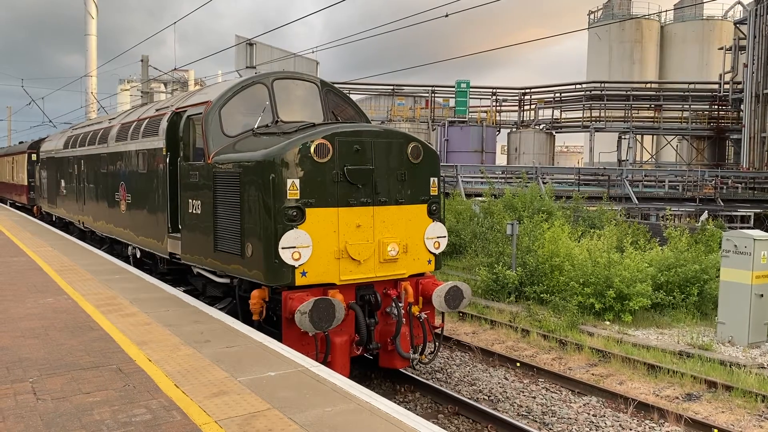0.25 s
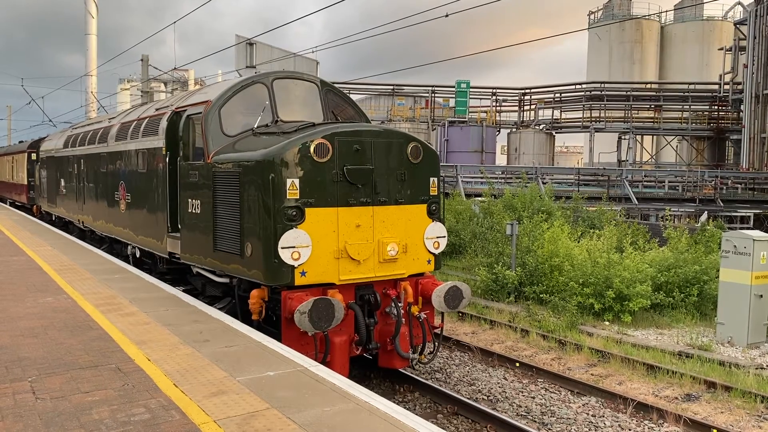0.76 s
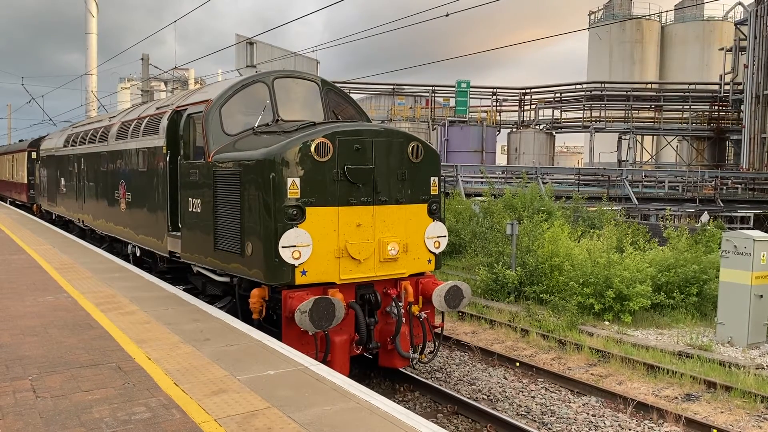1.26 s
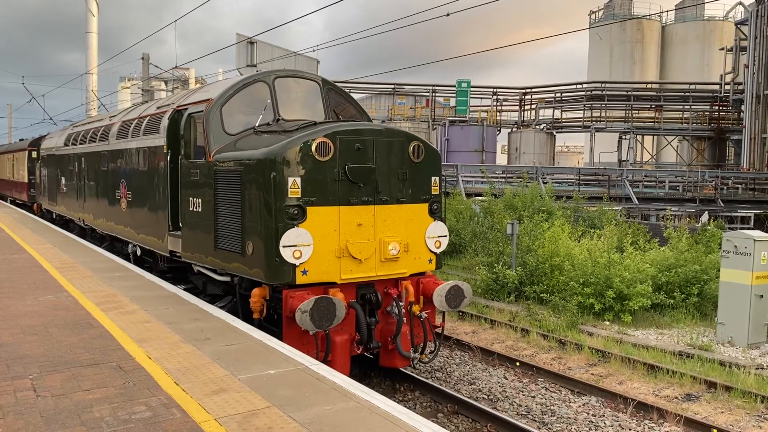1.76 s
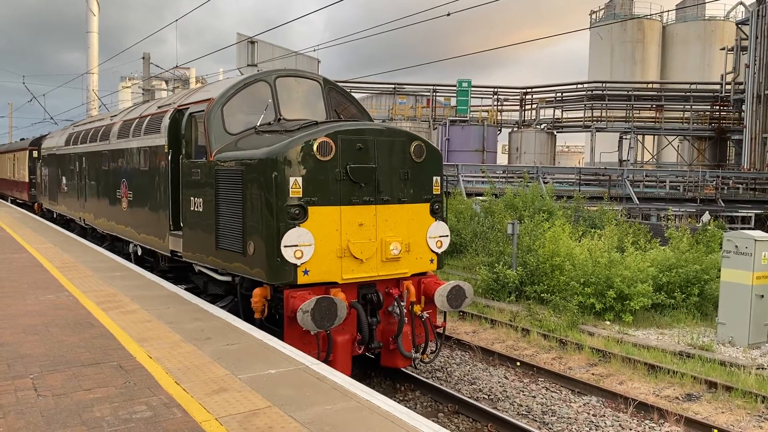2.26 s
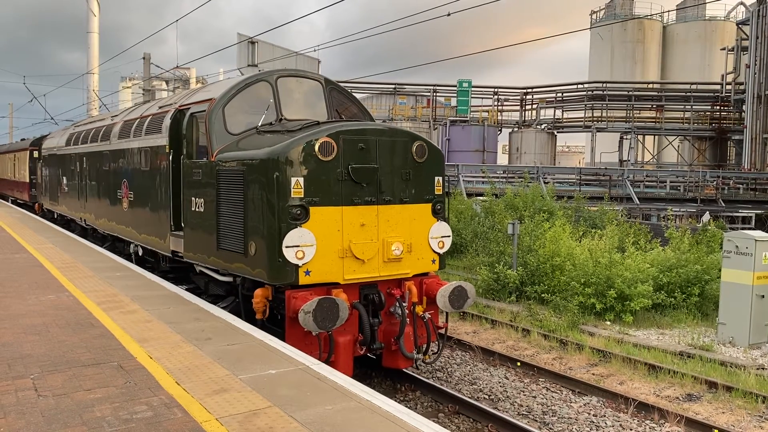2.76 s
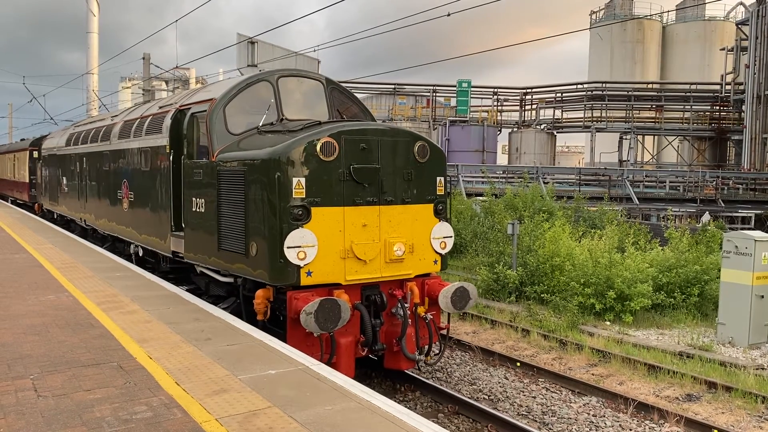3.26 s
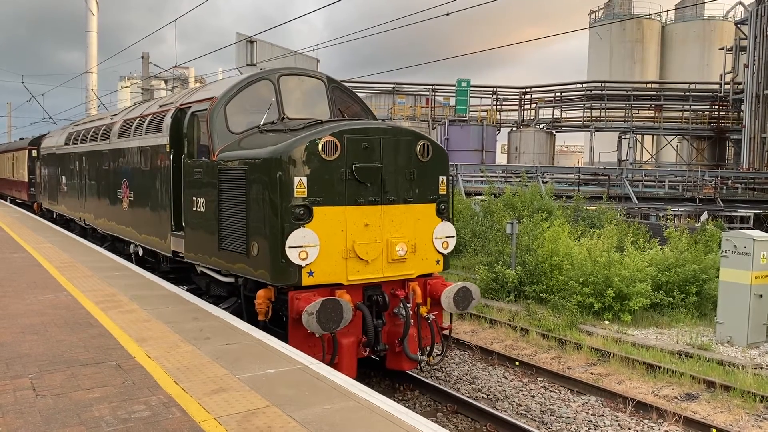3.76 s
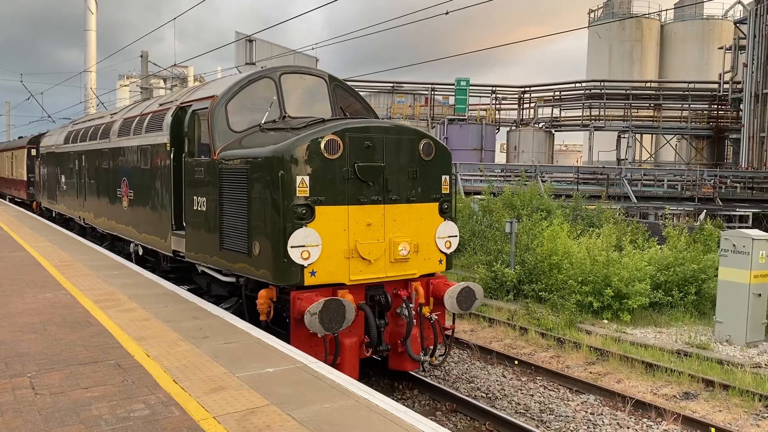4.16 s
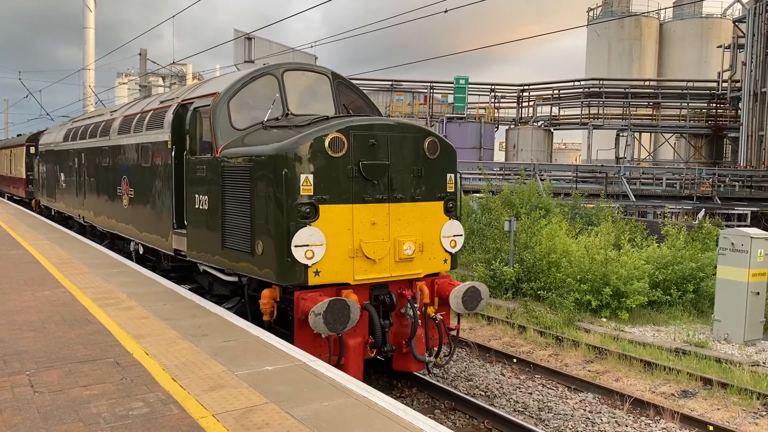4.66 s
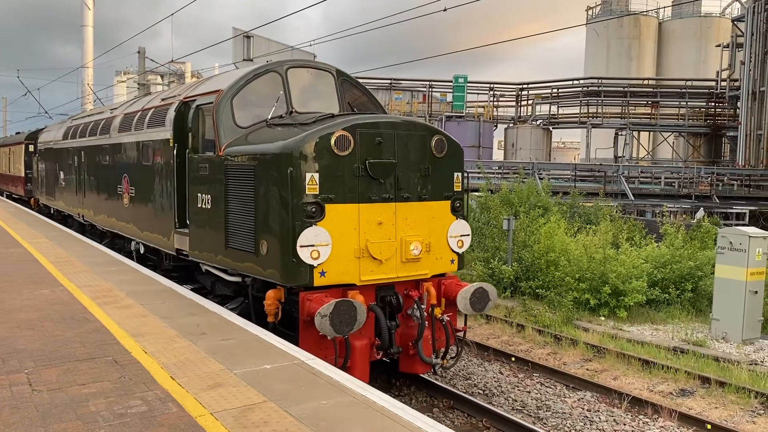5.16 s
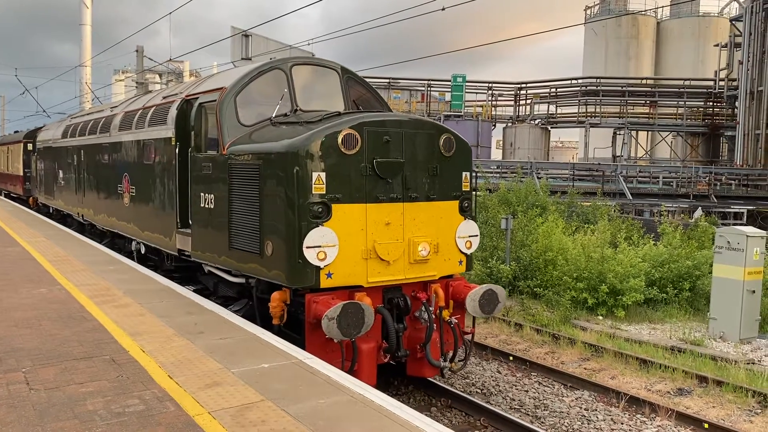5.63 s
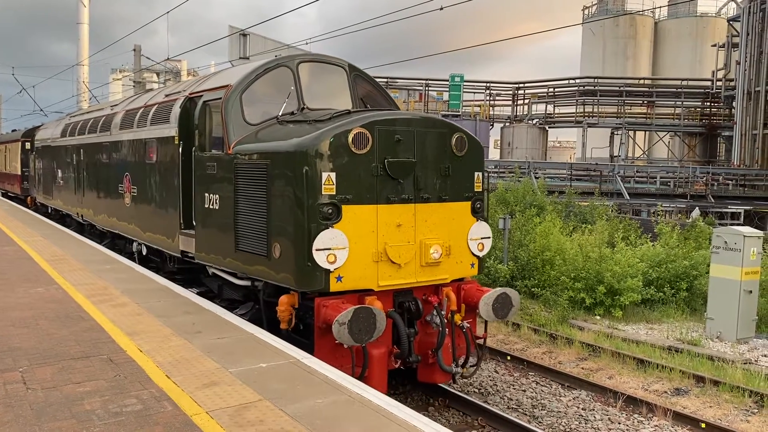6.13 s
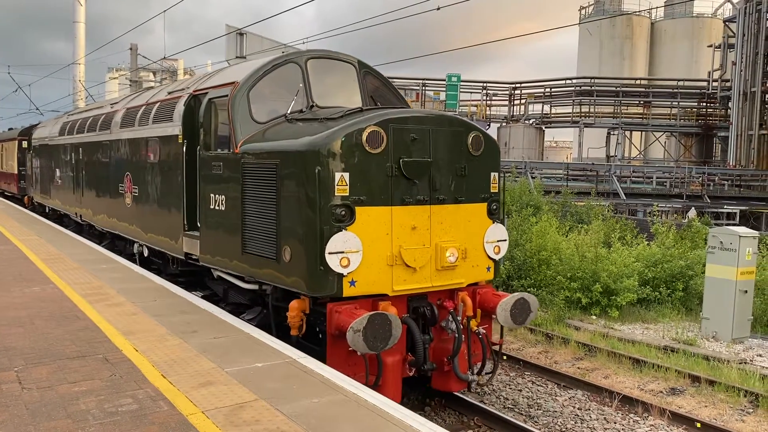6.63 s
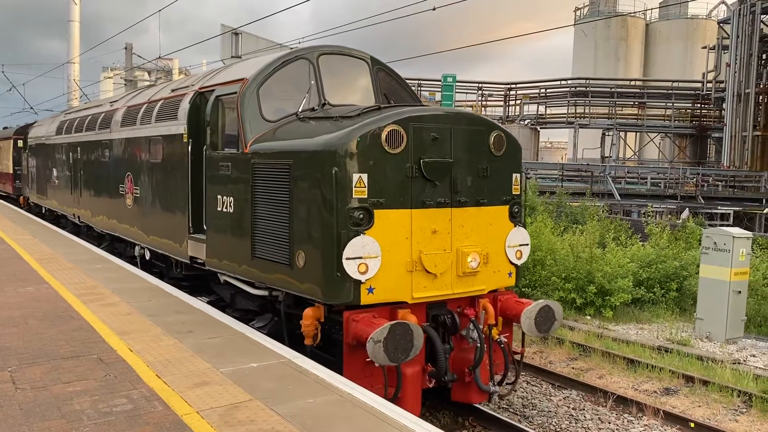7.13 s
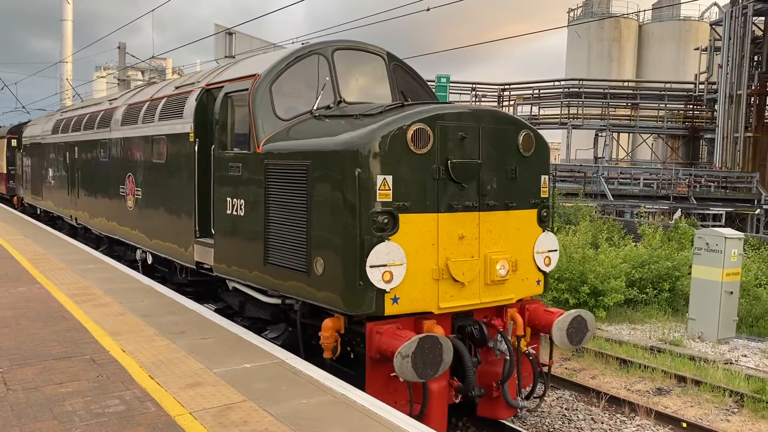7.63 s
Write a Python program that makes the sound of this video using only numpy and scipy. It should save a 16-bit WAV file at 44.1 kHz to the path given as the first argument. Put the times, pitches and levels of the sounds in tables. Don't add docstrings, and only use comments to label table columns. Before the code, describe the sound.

A diesel locomotive idles unevenly beside a platform, its turbo whistle wavering, then opens up into roaring exhaust blasts and a climbing whistle.

```python
import sys
import numpy as np
from scipy import signal
from scipy.fft import rfft, irfft, next_fast_len
from scipy.io import wavfile
from scipy.ndimage import uniform_filter1d

SR = 44100
rng = np.random.default_rng(int(sys.argv[2]) if len(sys.argv) > 2 else 0)


def voltage_ratio(level):
    return 10 ** (np.asarray(level, float) / 20)


def bounce(signal):
    frames = np.transpose(np.atleast_2d(signal))
    limited = np.clip(frames, -1, 1)
    pcm = np.round(limited * 32767).astype(np.int16)
    wavfile.write(sys.argv[1], SR, pcm)


N = 347949
TIME = np.arange(N) / SR

# place in sixteenths of a cycle, hiss level/dB, knock level/dB
FIRINGS = [(.6, -12, -9), (1.85, -1, -5), (4.4, -9, -9), (5.75, 0, -1), (7.75, -1, -6), (10.6, -13, -7),
           (11.75, -1, -1), (14.4, -6.5, -7)]


def evened(x):
    return x / np.sqrt(np.mean(x ** 2) + 1e-20)


def curves(rows):
    s, *columns = np.transpose(rows)
    return [np.interp(TIME, s, c) for c in columns]


def bump(s, width_s):
    return np.exp(-((TIME - s) / width_s) ** 2)


def noise(points):
    f, db = np.transpose(points)
    size = next_fast_len(N, True)
    hz = np.fft.rfftfreq(size, 1 / SR)
    gain = voltage_ratio(np.interp(np.log(hz + 1), np.log(f), db, left=-90, right=-90))
    return evened(irfft(rfft(rng.standard_normal(size)) * gain, size)[:N])


def drift(top_hz):
    f, start = np.geomspace(top_hz / 8, top_hz, 8), rng.random(8)
    t = TIME[::256, None]
    wander = np.sin(2 * np.pi * (f * t + start)).sum(1)
    return np.interp(TIME, t[:, 0], evened(wander))


def resonate(x, hz, width):
    turn = np.exp(2j * np.pi * np.cumsum(hz * np.ones(N)) / SR)
    r = np.exp(-np.pi * width / SR)
    return 2 * (turn * signal.lfilter([1 - r], [1, -r], x / turn)).real


def pipe(x, hz, width):
    peak = signal.iirpeak(hz, hz / width, SR)
    return signal.lfilter(*peak, signal.lfilter(*peak, x))


def breeze():
    # f/Hz, level/dB
    flutter = [(22, -16), (45, 0), (70, -1), (130, -5), (220, -15), (400, -32)]
    return voltage_ratio(-36) * np.array([noise(flutter), noise(flutter)])


def yard(x):
    t60_s = .1
    taps = np.zeros((6, 8000))
    at = np.arange(150, 7980, 20) + rng.integers(0, 20, (6, 392))
    np.put_along_axis(taps, at, rng.choice([-1., 1.], at.shape), 1)
    taps *= voltage_ratio(-60 * np.arange(8000) / SR / t60_s)
    turns = np.sqrt(2 / 3) * np.cos(2 * np.pi * (2.3 * TIME + np.arange(3)[:, None] / 3))
    sends = np.tile(x * turns, (2, 1))
    wet = signal.oaconvolve(sends, taps / np.linalg.norm(taps[0]), axes=1)[:, :N]
    return wet.reshape(2, 3, N).sum(1)


def generator():
    # f/Hz, level/dB
    tones = [(500.5, -42)]
    hum = 0
    for hz, db in tones:
        phase = hz * TIME + 0.31 * drift(9.)
        hum = hum + voltage_ratio(db + 2.5 + 3 * drift(2.6)) * np.sqrt(2) * np.sin(2 * np.pi * phase)
    return hum


def clunks():
    # t/s, peak level/dB, ring f/Hz, t60/s
    strains = [(0.116, 4.5, 226, 0.021), (2.069, -12, 250, 0.06), (2.771, -5.5, 227, 0.059),
               (6.34, -10, 182, 0.34), (4.035, -9.0, 510, 0.14), (6.282, -7.5, 236, 0.078),
               (6.452, -17, 210, 0.074), (6.35, -13, 210, .15)]
    out, t = np.zeros(N + 9000), np.arange(9000) / SR
    for s, db, hz, t60 in strains:
        envelope = voltage_ratio(db - 60 * t / t60) * (1 - np.exp(-t / 0.0053))
        out[round(s * SR):][:9000] += envelope * np.sin(2 * np.pi * hz * t)
    return out[:N]


def levels(cycles, load):
    # t/s, level change/dB, half-width/s
    lulls = [(.06, 5, 0.025), (.31, -3, .12), (1.19, 0, .06), (2.022, 1, .15), (3.05, 3, 0.094),
             (3.14, -2, .05), (3.25, 3.5, 0.055), (3.82, -9, 0.039), (4.48, -5.5, 0.074), (4.65, 1.5, 0.13),
             (4.85, 1.5, 0.12), (5.69, -6, 0.066), (5.92, 7, .04), (6.02, 0, 0.025), (6.111, -1.5, .04),
             (6.22, -11, 0.033), (6.72, -12, 0.025), (7.29, -31, 0.039), (7.5, 1, 0.037), (7.56, -7, 0.037),
             (7.88, -2, 0.074)]
    # t/s, level change/dB
    blower_swell = [(0, 0), (.4, -3), (.7, 0), (1.3, -4), (1.7, 3), (2.3, 5), (2.8, 5), (3.0, -4), (3.5, 0),
                    (3.9, -6), (4.3, 2), (4.7, 1), (5, 2), (5.4, 4), (5.7, -5), (6.3, -3), (6.7, 5),
                    (7.1, -2)]
    touch = np.tanh(load / 0.26)
    thump_db = -24 + 0.5 * touch + 4 * load
    casing_db = -30.5 + 1.92 * touch + 6 * load
    hiss_db = -45 - 1.56 * touch + 11.5 * load
    blower_db = -26.5 + 5 * touch - 4.5 * load
    thump_db += sum(db * bump(s, w) for s, db, w in lulls)
    thump_db -= 1.5 * np.cos(2 * np.pi * (cycles - 1))
    hiss_db += 1.5 * bump(6.8, 0.19)
    blower_db += curves(blower_swell)[0]
    return thump_db, casing_db, hiss_db, blower_db


def thump(cycles, level_db, blower_db):
    # multiple of the cycle rate, level against the thump/dB
    orders_db = [(12, -19), (13, -15), (14, -15), (15, -14), (16, -3), (17, -9), (18, -11), (19, -11),
                 (20, -15), (21, -11), (23, -11), (24, -10), (25, -12), (26, -12), (28, -11), (34.4, -13),
                 (36, -18), (44, -16)]
    # f/Hz, level/dB
    rumble = [(22, -53), (40, 1.5), (60, -10), (100, 2.5), (130, 2.5), (180, -4), (260, -11.5), (400, -16)]
    # t/s, level change/dB, half-width/s
    slack = [(.55, -1.5, 0.17), (1.15, 2.5, 0.21), (2.2, -0.5, 0.17), (2.75, 2, 0.18), (3.04, -10.5, 0.095),
             (3.6, -2, 0.054), (4.66, -4, 0.27), (5.05, 0.5, .1), (5.97, -13, 0.056), (6.25, 4.5, .1),
             (7.25, 5, 0.066)]
    blower_order = 31.3
    orders = 0
    for k, db in orders_db:
        phase = k * (cycles - .5) + .18 * drift(1.6) + .06
        orders = orders + voltage_ratio(db + 3 * drift(2.5)) * np.cos(2 * np.pi * phase)
    blower_phase = blower_order * cycles + 0.06 * drift(5.8)
    blower = voltage_ratio(blower_db - 1.5) * np.sqrt(2) * np.sin(2 * np.pi * blower_phase)
    slack_db = sum(db * bump(s, w) for s, db, w in slack)
    return voltage_ratio(level_db) * (np.sqrt(2) * voltage_ratio(slack_db) * orders + voltage_ratio(-1) * noise(rumble)) + blower


def blasts(cycles, rise_s, scatter_db):
    # t/s, level change/dB
    odd_blasts = [(0.621, 11), (.99, 8), (1.26, 5), (1.62, 4.5), (1.94, 6), (3.717, 2), (3.84, 2.5),
                  (4.01, 2.5), (4.53, 1), (5.03, 1), (5.91, 6), (6.18, -2.5), (6.288, -2), (6.39, 1.5),
                  (6.63, -1), (6.66, 3.5), (6.9, -0.5), (6.93, 0.5), (7.2, 1), (7.37, 2), (7.432, 2),
                  (7.53, -0.5), (7.7, -2), (7.766, 1), (7.8, -4)]
    t = np.arange(2500) / SR / (1.5 * rise_s)
    turns = np.arange(-1, 31)
    chance = np.clip(rng.standard_normal((len(FIRINGS), len(turns))), -1.5, 1.5)
    trains = np.zeros((len(FIRINGS), N))
    for train, row, luck in zip(trains, FIRINGS, chance):
        at = np.searchsorted(cycles, turns + row[0] / 16 - 5.5 * rise_s)
        inside = (at > 0) & (at < N)
        train[at[inside]] = voltage_ratio(scatter_db * luck[inside])
    shape = (t * np.exp(1 - t)) ** 18
    odd_db = sum(db * bump(s, .014) for s, db in odd_blasts)
    return voltage_ratio(odd_db) * abs(signal.oaconvolve(trains, shape[None], axes=1)[:, :N])


def casing(pulses, load, level_db):
    # f/Hz, level/dB
    roar_bands = [(120, -1), (250, -2), (420, -7.5), (600, -2.5), (800, -8.5), (1050, -12), (1300, -17.5),
                  (1500, -15), (1900, -23), (2400, -21), (3200, -16.5), (4500, -65)]
    # f/Hz, width/Hz, level/dB
    stack = [(172, 97, -30), (337.2, 55, 5), (537, 70, 8), (915, 290, 3), (1420, 220, -3.5)]
    # f/Hz, width/Hz, level/dB
    chimney = [(984, 16, -8), (1520, 170, -11.5), (590, 65, -17)]
    knock = voltage_ratio(np.transpose(FIRINGS)[2]) @ pulses
    gas = rng.standard_normal(N)
    ring = evened(sum(voltage_ratio(db) * pipe(gas, hz, w) for hz, w, db in stack))
    puffs = gas * knock * load ** 2
    after = sum(voltage_ratio(db) * evened(pipe(puffs, hz, w)) for hz, w, db in chimney)
    roar = noise(roar_bands) * (1 + 0.4 * load ** 0.41 * knock)
    push = evened(np.gradient(np.gradient(knock)))
    driven = load ** 0.89 * (voltage_ratio(10) * knock * ring - voltage_ratio(-6) * push)
    return voltage_ratio(level_db) * (voltage_ratio(4 - 3 * load) * roar + driven + voltage_ratio(-14) * after)


def barks():
    # t/s, f/Hz, peak level/dB
    notes_sung = [(6.187, 997, -16.5), (6.292, 924, -16), (6.362, 942, -17.5), (6.463, 1035, -15.5),
                  (6.633, 1107, -16.5), (6.667, 997, -26), (6.737, 888, -16.5), (6.937, 946, -17),
                  (7.001, 1020, -20), (7.105, 918, -22), (7.173, 1018, -13), (7.267, 1027, -15),
                  (7.31, 1045, -21), (7.438, 938, -13.5), (7.536, 1005, -15.5), (7.637, 860, -26),
                  (7.738, 953, -17.5), (7.802, 837, -19.5)]
    rise_s, sag = .009, 0.082
    out, t = np.zeros(N + 9000), np.arange(3000) / SR
    u = t / rise_s
    for s, hz, db in notes_sung:
        note = np.sin(2 * np.pi * np.cumsum(hz * (1 + sag * (1.2 - u) / 2)) / SR)
        out[round((s - rise_s) * SR):][:3000] += voltage_ratio(db) * (u * np.exp(1 - u)) ** 2 * note
    return out[:N]


def exhaust(pulses, load, level_db):
    # f/Hz, level/dB
    hiss = [(1100, -8), (2200, -2.5), (3250, -1.5), (3700, 1.5), (4400, 2), (5500, -6.5), (7000, -10),
            (9000, -13), (11500, -18.5), (14000, -23.5), (16200, -23)]
    # f/Hz, level/dB
    crack = [(4500, -20), (6000, -23), (8000, 15), (12000, 1), (16200, -18)]
    # f/Hz, level/dB
    slap = [(150, -20), (300, 7), (600, -3), (1000, 2), (1500, 3), (2200, -7), (2900, -7), (3600, -25)]
    pops = evened(uniform_filter1d(rng.standard_normal(N), size=round(.0025 * SR)))
    crackle_db = 2.3 * (np.clip(pops, -2, 2) - .3)
    burst = voltage_ratio(np.transpose(FIRINGS)[1]) @ pulses * voltage_ratio(crackle_db)
    gusts_db = .9 * drift(12.)
    jet = noise(hiss) * (1 - 0.088 * load + (.5 + 4.2 * load) * burst)
    front = voltage_ratio(3.5) * load * burst ** 2 * noise(crack)
    body = voltage_ratio(-1.5 + 7.5) * load ** .5 * burst * noise(slap)
    return voltage_ratio(level_db + 5 - 2.85 * load + gusts_db) * (jet + front + body)


def flares(hz):
    # t/s, level/dB, f/Hz
    turbine_flares = [(0.132, -16.6, 2871), (0.231, -18.4, 2852), (0.391, -15.9, 2847), (0.502, -20.1, 2853),
                      (0.625, -17.0, 2839), (0.666, -21.4, 2852), (0.725, -17.3, 2867), (0.764, -20.5, 2864),
                      (0.895, -19.0, 2853), (0.996, -18.6, 2848), (1.037, -20.9, 2859), (1.073, -20.5, 2858),
                      (1.16, -20.8, 2858), (1.192, -22.3, 2851), (1.259, -17.3, 2870), (1.301, -21.1, 2891),
                      (1.339, -21.6, 2863), (1.422, -19.8, 2875), (1.454, -19.6, 2868), (1.519, -17.4, 2878),
                      (1.558, -19.7, 2898), (1.62, -19.4, 2899), (1.681, -16.7, 2889), (1.711, -20.9, 2880),
                      (1.776, -16.9, 2903), (1.817, -18.5, 2921), (1.853, -20.6, 2906), (1.874, -21.5, 2899),
                      (1.935, -16.7, 2893), (1.965, -18.8, 2906), (2.029, -18.9, 2906), (2.065, -21.1, 2929),
                      (2.124, -20.6, 2934), (2.184, -18.2, 2925), (2.221, -23.2, 2929), (2.283, -22.8, 2914),
                      (2.313, -20.3, 2924), (2.353, -20.8, 2935), (2.467, -19.2, 2930), (2.558, -19.1, 2919),
                      (2.716, -16.4, 2897), (2.817, -18.8, 2899), (2.98, -16.8, 2899), (3.042, -21.8, 2897),
                      (3.074, -20.2, 2886), (3.127, -20.6, 2920), (3.238, -16.6, 2878), (3.308, -21.4, 2882),
                      (3.345, -21.0, 2882), (3.474, -18.1, 2868), (3.509, -18.5, 2876), (3.575, -17.1, 2867),
                      (3.614, -20.2, 2889), (3.651, -20.2, 2883), (3.741, -19.0, 2857), (3.77, -21.9, 2860),
                      (3.84, -15.6, 2888), (3.88, -20.0, 2918),
                      (4.006, -16.5, 2887), (4.041, -21.6, 2908), (4.104, -16.4, 2920), (4.183, -20.3, 2935),
            (4.205, -20.8, 2930), (4.268, -17.6, 2919), (4.364, -19.7, 2946), (4.464, -20.7, 2935),
            (4.524, -16.5, 2944), (4.619, -16.7, 2971), (4.697, -21.2, 2973), (4.718, -20.1, 2969),
            (4.777, -16.0, 2980), (4.809, -22.3, 2991), (4.872, -16.6, 2998), (4.947, -22.0, 3016),
            (5.028, -17.5, 3006), (5.06, -23.1, 3026), (5.121, -21.0, 3029), (5.161, -23.4, 3028),
            (5.279, -21.4, 3006), (5.311, -24.3, 3023), (5.37, -26.9, 3015), (5.411, -24.3, 3017),
            (5.461, -25.9, 3042), (5.568, -22.5, 3000), (5.657, -25.3, 3002), (5.719, -27.5, 2985),
            (5.802, -25.4, 2968), (5.838, -21.0, 2974), (5.905, -23.1, 2963), (6.08, -14.5, 3014),
            (6.184, -13.2, 3041), (6.293, -17.5, 3033), (6.358, -11.3, 3084), (6.396, -16.3, 3088),
            (6.466, -14.7, 3096), (6.518, -17.2, 3085), (6.569, -14.7, 3102), (6.632, -11.5, 3173),
            (6.668, -18.2, 3223), (6.733, -15.8, 3211), (6.812, -18.3, 3222), (6.901, -13.4, 3273),
            (7.0, -14.7, 3329), (7.047, -15.9, 3335), (7.101, -20.2, 3352), (7.15, -19.9, 3369),
            (7.169, -13.8, 3380), (7.198, -18.1, 3414), (7.268, -16.1, 3405), (7.368, -15.8, 3402),
            (7.433, -16.1, 3443), (7.465, -18.5, 3488), (7.535, -18.0, 3481), (7.636, -16.4, 3460),
            (7.704, -23.8, 3491), (7.723, -23.3, 3551)]
    s, db, flare_hz = np.array(turbine_flares).T[:, :, None]
    t = TIME[::64]
    near = np.exp(-((t - s) / .0095) ** 2)
    pull = near * (flare_hz - np.interp(s, TIME, hz))
    pull_hz = pull.sum(0) / np.maximum(near.sum(0), .5)
    lift_db = .3 + 5 * (flare_hz - hz.min()) / 1000
    height = np.sqrt(((near * voltage_ratio(db + lift_db)) ** 2).sum(0))
    return np.interp(TIME, t, height), np.interp(TIME, t, pull_hz)


def turbo(pulses, load):
    # t/s, f/Hz, level/dB
    whistle = [(0.0, 2880, -24), (0.5, 2864, -23), (1.2, 2869, -25), (1.6, 2891, -23.5), (2.25, 2931, -22),
               (3.0, 2900, -25), (3.6, 2885, -26.5), (4.0, 2913, -22), (4.8, 2992, -20), (5.2, 3017, -22),
               (5.6, 3005, -27), (6.0, 3002, -22), (6.4, 3082, -15), (6.75, 3193, -17), (7.2, 3383, -12.5),
               (7.6, 3489, -23.5), (7.89, 3610, -21.5)]
    hz, level_db = curves(whistle)
    flare, pull_hz = flares(hz)
    speed = ((hz - hz.min()) / 700) ** 3
    near_hz = hz + pull_hz + (14 + 25 * load ** 2 + 50 * speed) * drift(90.)
    near = 2 * np.pi * np.cumsum(near_hz) / SR
    twin_hz = hz + 58 + (12 + 50 * load ** 2 + 60 * speed) * drift(60.)
    twin = 2 * np.pi * np.cumsum(twin_hz) / SR
    centre_hz = hz + (40 * load ** 2 + 80 * speed) * drift(80.)
    far = evened(resonate(resonate(rng.standard_normal(N), centre_hz, 110.), centre_hz, 110.))
    lead = 2 * np.pi * np.cumsum(140 * bump(4.65, .3)) / SR
    spots = np.minimum(voltage_ratio(np.transpose(FIRINGS)[1]) @ pulses, .6)
    height = np.hypot(voltage_ratio(level_db - 10 - 5 * load + 3.5 * drift(70.)), flare)
    overtone_fuzz = evened(resonate(rng.standard_normal(N), 2 * hz, 110.))
    overtone = height * spots * np.sin(2 * near + lead) + .07 * voltage_ratio(level_db) * overtone_fuzz
    others = voltage_ratio(-11 + 3 * drift(30.)) * np.sin(twin) + voltage_ratio(-11 + .8 * load) * far
    overtone_gain = voltage_ratio(-21 + 16 * load * (1.2 - load))
    return height * np.sin(near) + voltage_ratio(level_db) * others + overtone_gain * overtone


def ports(direct, echo):
    # f/Hz, left lead/rad, left-right level/dB, direct share
    port_bands = [(90, 0, .2, .975), (250, .05, 1.1, .84), (600, .55, 2.7, .8), (1400, 1.1, 1.2, .86),
                  (2200, 1.9, 1, .68), (2900, 2.4, 7, .85), (3400, 3.3, 2, .8), (4200, 6.2, -.3, .9),
                  (5500, 7.6, 1.5, .55), (6100, 7.6, 6, .6), (7000, 6.3, .8, .85), (9000, 3.14, .1, .72),
                  (15400, -6.4, .2, .6)]
    f, *columns = np.transpose(port_bands)
    hz = np.fft.rfftfreq(N, 1 / SR)
    lead, balance_db, share = (np.interp(hz, f, c) for c in columns)
    share, side = np.clip(share, 0, 1), np.array([[.5], [-.5]])
    heard = np.sqrt(share) * rfft(direct) * np.exp(1j * side * lead)
    heard = heard + np.sqrt(1 - share) * rfft(echo)
    return irfft(heard * voltage_ratio(side * balance_db), N)


def scene():
    # t/s, four-stroke cycle rate f/Hz
    crank = [(0, 3.819), (.5, 3.767), (1, 3.715), (1.5, 3.871), (2, 3.991), (2.5, 4.020), (3, 3.801),
             (3.5, 3.720), (4, 3.786), (4.5, 3.919), (5, 4.026), (5.5, 3.873), (6, 3.528), (6.5, 3.663),
             (7, 3.771), (7.5, 3.749), (8, 3.622)]
    # t/s, load 0-1
    rack = [(0, 0.02), (.5, 0), (1, 0.01), (1.4, 0.17), (1.9, 0.22), (2.6, 0.02), (3.3, 0.01), (3.7, 0.13),
            (4.5, 0.38), (4.9, 0.37), (5.5, 0.05), (5.85, 0.13), (6.02, 0.28), (6.15, 0.72), (6.8, 0.95),
            (7.3, 0.75), (7.89, 0.74)]
    # middle t/s, half-length/s
    coasting = [(.15, .4), (2.88, .55), (5.6, .26)]
    # blast change/dB, whistle change/dB
    starved_db = [(2, 0), (-14, -8), (8, 0), (-16, -16), (0, 6), (9, 0), (-12, -7), (4, 3)]
    cycles = np.cumsum(curves(crank)[0]) / SR
    load = np.clip(curves(rack)[0], 0, 1.2)
    thump_db, casing_db, hiss_db, blower_db = levels(cycles, load)
    coast = sum(np.exp(-((TIME - s) / w) ** 6) for s, w in coasting)
    gas, blades = voltage_ratio(np.transpose(starved_db)[:, :, None] * coast)
    loco = generator() + clunks() + thump(cycles, thump_db, blower_db) + barks()
    loco += casing(gas * blasts(cycles, 0.014, 0.42), load, casing_db)
    loco += exhaust(gas * blasts(cycles, .0118, 1.3), load, hiss_db)
    whistle = turbo(blades * blasts(cycles, .0128, 1.2), load)
    echo = yard(loco + .8 * whistle)
    return ports(loco + whistle, echo) + breeze()


def thin_treble(x):
    full_moments = [.63, 1.93, 4.02, 4.52, 6.08, 6.19, 6.3, 6.36, 6.46, 6.56, 6.66, 6.73, 6.84, 7.27, 7.43,
                    7.7]
    # 0 sum or 1 difference, from f/Hz, to f/Hz, share of moments kept
    thinned = [(0, 8350, 8600, .45), (0, 8600, 8850, .15), (0, 8850, 9600, 0), (0, 12450, 13800, 0),
               (0, 13800, 14150, .22), (0, 14150, 14500, .33), (0, 14500, 14850, .33),
               (0, 14850, 15200, .25), (0, 15200, 15900, 0), (1, 6500, 6900, .5), (1, 6900, 7450, .25),
               (1, 10350, 10750, .05), (1, 10750, 11650, 0), (1, 13750, 14150, .45), (1, 14150, 14550, .2),
               (1, 14550, 15900, 0)]
    top_hz = 15900
    window = np.sqrt(signal.windows.hann(2048, sym=False))
    mid_side = np.array([x[0] + x[1], x[0] - x[1]]) / 2
    hz, t, z = signal.stft(mid_side, SR, window, nperseg=2048)
    full = abs(t[:, None] - np.array(full_moments)).min(1) < .013
    keep = np.ones(z.shape) * (hz[:, None] < top_hz)
    for channel, low_hz, high_hz, share in thinned:
        band = (hz >= low_hz) & (hz < high_hz)
        keep[int(channel), band] = full | (rng.random(len(t)) < share)
    mid, side = signal.istft(z * keep, SR, window, nperseg=2048)[1][:, :N]
    return np.array([mid + side, mid - side])


def low_pass(x):
    return signal.sosfilt(signal.butter(12, 16660, fs=SR, output="sos"), x)


def record(dry):
    limited = 1.06 * np.tanh(dry / 1.15)
    mix = thin_treble(limited)
    return low_pass(mix)


dry = scene()
out = record(dry)
bounce(out)
```